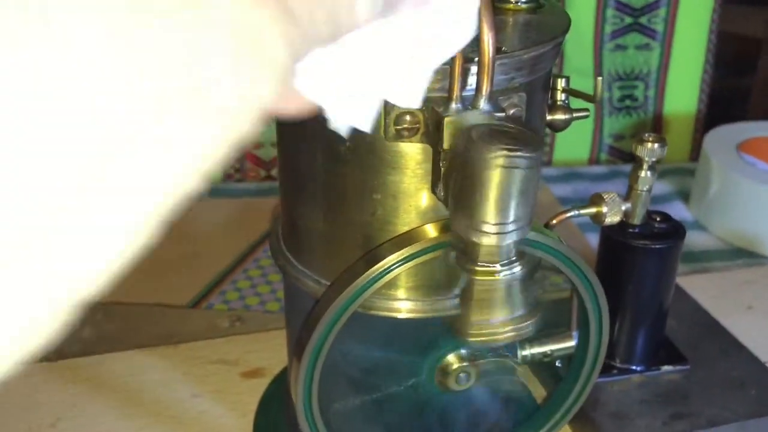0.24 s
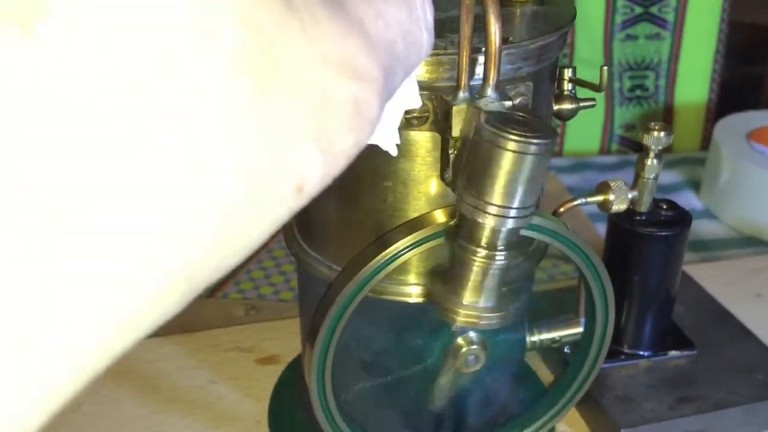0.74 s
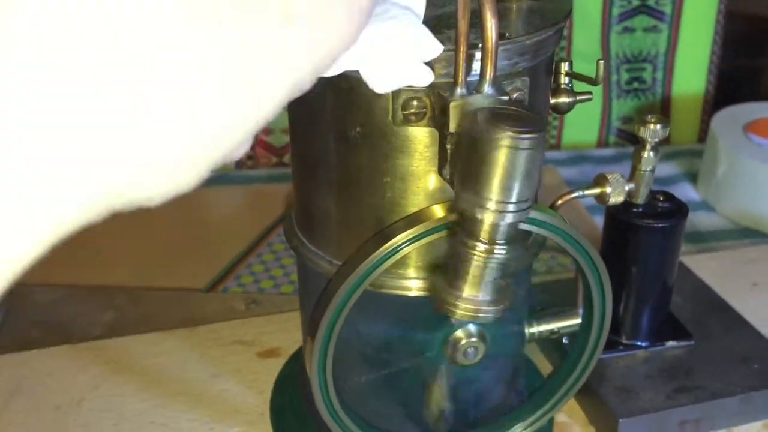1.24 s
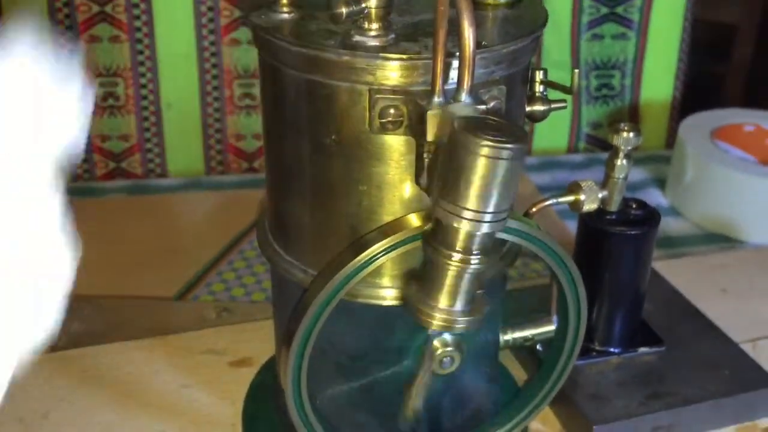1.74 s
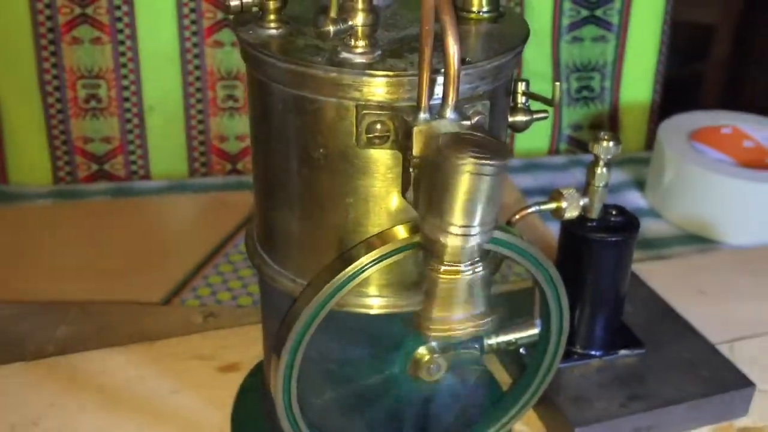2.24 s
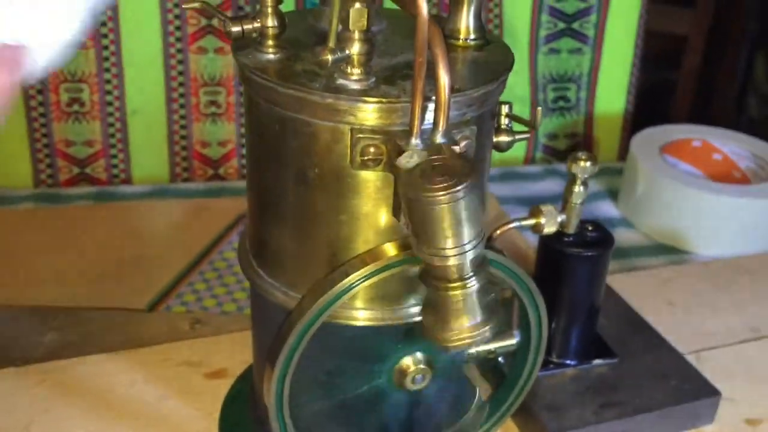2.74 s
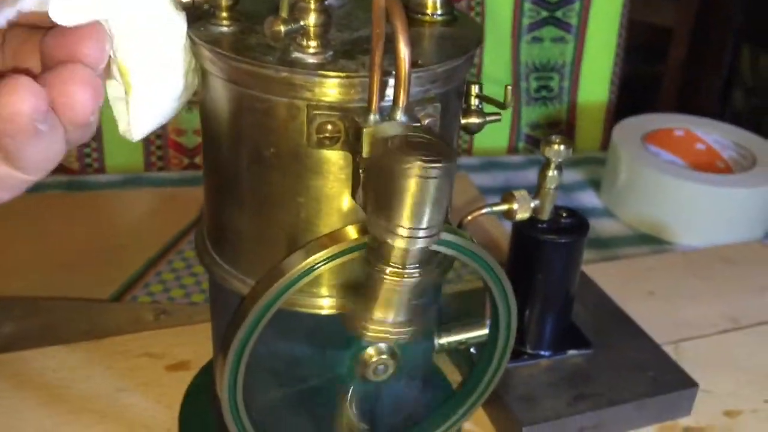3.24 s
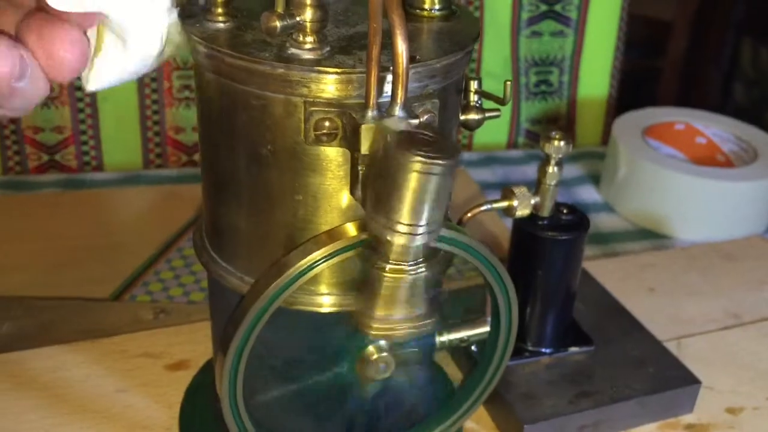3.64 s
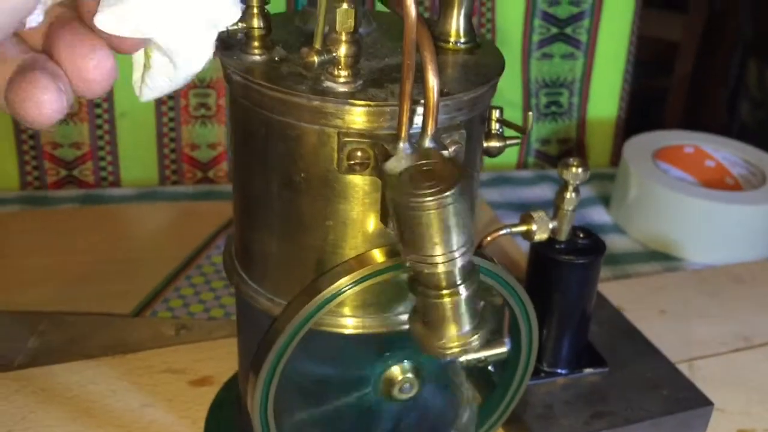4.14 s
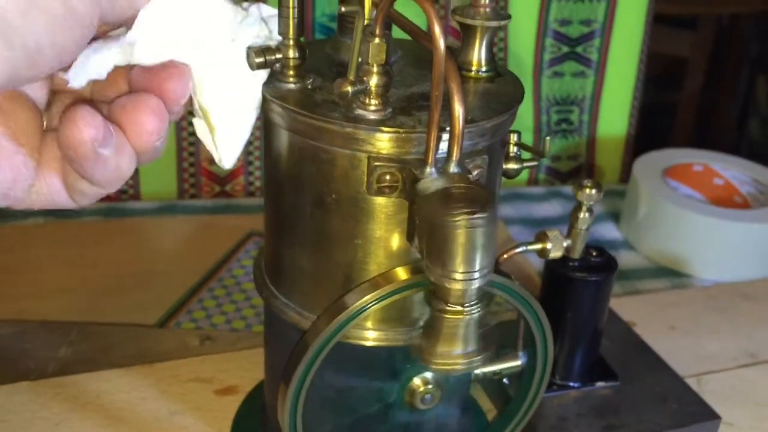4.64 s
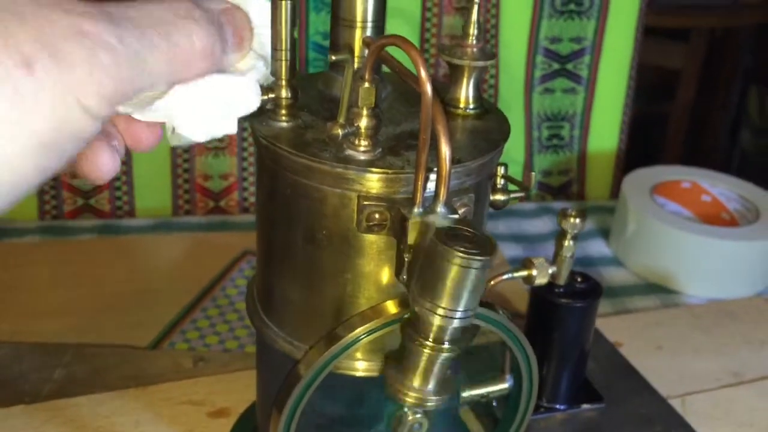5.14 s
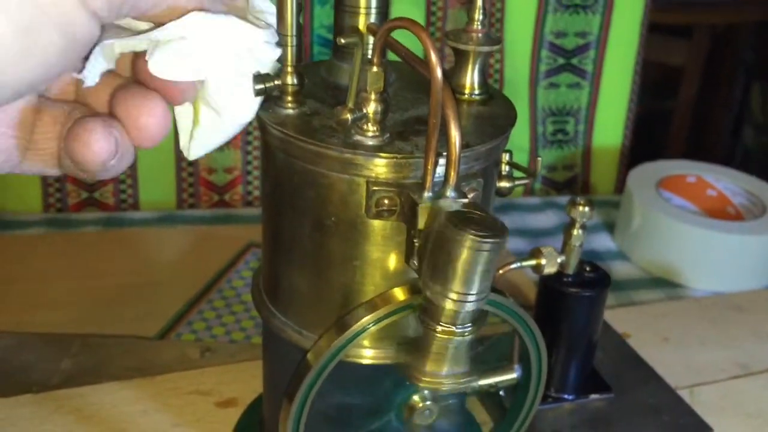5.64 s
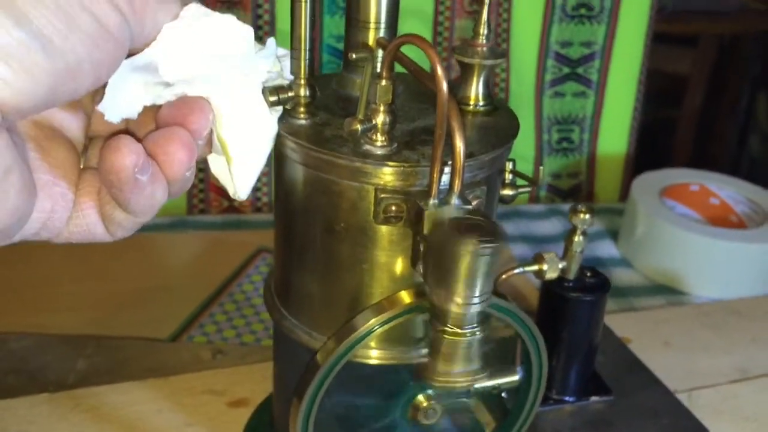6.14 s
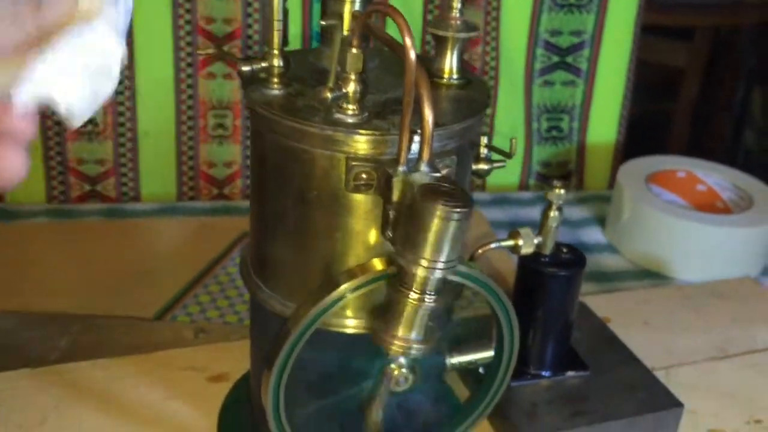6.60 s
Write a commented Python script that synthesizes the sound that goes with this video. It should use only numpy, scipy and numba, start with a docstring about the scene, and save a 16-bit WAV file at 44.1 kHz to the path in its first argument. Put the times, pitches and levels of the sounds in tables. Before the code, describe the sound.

A miniature one-cylinder steam engine runs close by in a small room, about ten chuffs a second, each with a throaty pipe note, loose metal knocks and a spitting exhaust puff. It quickens slightly, then a piercing, very high whistle blows twice, wet and sputtering first, cleaner the second time. Each blast drowns the engine and droops at its end; the mono pickup ducks, then recovers.

```python
"""A small one-cylinder steam engine turns about ten times a second, quickening from 1 s to 3 s.
Each turn admits steam through a ringing pipe, knocks in loose bearings and puffs out the exhaust.
Early on a fitting hisses briefly. At 3.8 s and 5.2 s a hand opens the boiler's whistle: a gliding tone
that sputters on wet steam, swells, and sags as the valve shuts; faint chirps seep past the valve.
A small room answers; a slow gain control sinks under loud sound and recovers at a steady rate."""
import sys
import numpy as np
from scipy import signal
from scipy.fft import rfft, irfft, next_fast_len
from scipy.io import wavfile
from scipy.ndimage import uniform_filter1d, minimum_filter1d, map_coordinates
from numba import njit

SR = 44100
rng = np.random.default_rng(int(sys.argv[2]) if len(sys.argv) > 2 else 0)


def log_audio(samples):
    """Write samples as a 16-bit WAV file to the path given in sys.argv[1]."""
    # one column per channel
    frames = np.atleast_2d(samples).T
    # limit to full scale, then quantise
    limited = np.clip(frames, -1, 1)
    pcm = np.round(limited * 32767).astype(np.int16)
    wavfile.write(sys.argv[1], SR, pcm)


N = 302967

# Room decay. Each row: frequency in Hz, t60 in seconds.
ROOM_DECAY = [(100, 0.072), (400, 0.15), (1000, 0.27), (5000, 0.29), (15000, 0.063)]
# Microphone's bass cut. Each row: frequency in Hz, gain in dB.
MIC_BASS_CUT = [(20, -32), (38, -16.5), (52, 0), (70, 0.5)]
# Colour of boiler simmer and room murmur. Each row: frequency in Hz, relative density in dB.
SIMMER_COLOUR = [(25, -25.5), (60, -0.5), (140, 5.5), (280, -11), (450, -9.5), (700, 1.5), (1250, -6),
                 (1900, -0.5), (2600, -5), (5000, -16), (6200, -12.5), (7500, -31), (9000, -13),
                 (10400, -17), (12000, -20.5), (15500, -19.5)]
# Short hiss from a boiler fitting. Each row: time in seconds, level in dB.
WEEP_LEVEL = [(0, -51), (.19, -59.5), (.22, -51.5), (.27, -44.5), (.305, -48.5), (.345, -50), (.39, -47.5),
              (.6, -72.5)]
# Colour of that hiss. Each row: frequency in Hz, relative density in dB.
WEEP_SPECTRUM = [(1000, -19.5), (3000, 6.5), (5000, 0), (8500, 0), (11000, -4.5), (15500, -12.5)]
# Flywheel speed. Each row: time in seconds, turns per second.
FLYWHEEL_SPEED = [(0.0, 9.617), (1.05, 9.636), (1.4, 9.965), (2.0, 10.42), (3.0, 10.758), (3.8, 10.669),
                  (4.5, 10.458), (5.1, 10.552), (5.8, 10.137), (6.87, 10.198)]
# How hard the engine works. Each row: time in seconds, base level in dB.
ENGINE_EFFORT = [(0, -31), (.95, -32.5), (1.3, -31), (2.1, -29.5), (2.65, -30.5), (3.35, -30.3), (3.7, -29),
                 (4.2, -31), (6.87, -32)]
# Modes of base plate and table top. Each row: frequency in Hz, t60 in seconds,
# dB pushed at the crank, dB pushed at the piston (both relative).
BASE_MODES = [(62.6, 0.02, -24.5, -23.5), (117.5, 0.035, -12.5, -1), (139.7, 0.34, -31.5, -24),
              (206, 0.033, -9.5, -12.5), (340.6, 0.024, -4, -4.5)]
# Hand bumping the boiler. Each row: time in seconds, level in dB.
HAND_BUMPS = [(5.085, -40.5), (5.307, -30), (5.334, -35)]
# Exhaust colour. Each row: frequency in Hz, relative density in dB.
EXHAUST_COLOUR = [(60, -17), (250, -7.5), (450, 4), (1000, -11.5), (2500, 10.5), (5000, 1.5), (6200, 4.5),
                  (9500, 4), (10400, -0.5), (11600, 4.5), (15500, 3.5)]
# Modes of the engine frame. Each row: frequency in Hz, t60 in seconds,
# dB struck at the crank, dB struck at the piston (both relative).
FRAME_MODES = [(540, 0.043, -26.5, -16), (704, 0.048, -12, -18.5), (812, 0.048, -8.5, -25.5),
               (1009, 0.025, -5, -13.5), (1099, 0.029, 0.5, -26.5), (1680, 0.032, -4.5, -10.5),
               (1927, 0.017, 1.5, 4), (2057, 0.034, -11.5, 5.5), (2188, 0.03, -7.5, -12.5),
               (2860, 0.012, -3.5, 0.5), (3360, 0.015, -8, -4), (3660, 0.029, -11, -21.5),
               (4400, 0.011, -6, -24.5), (6460, 0.027, -24.5, -13)]
# Metal contacts around dead centre. Each row: share of a turn after the knock, relative level in dB,
# timing scatter in seconds, place from 0 (crank) to 1 (piston).
DEAD_CENTRE_CONTACTS = [(-.058, -6.5, 0.0016, 0.39), (-.035, -14, 0.00068, 0.96), (0, 2, 0.000089, 0.12),
                        (.098, 0.5, 0.00024, 0.4), (0.116, -12.5, 0.00039, 0.085),
                        (0.168, -11.5, 0.0012, 0.88)]
# Resonances of steam pipe and cylinder. Each row: frequency in Hz, width in Hz, relative level in dB.
PIPE_RESONANCES = [(130, 71, -30.5), (726, 53, -4), (1060, 84, -11), (1561, 102, -0.5), (3106, 110, -7),
                   (3530, 460, -14.5), (4306, 140, -7), (5967, 284, -8.5), (8700, 300, -18.5)]
# Steam flow in one stroke. Each row: seconds after admission, rush in dB, pipe note in dB (both relative).
STROKE_FLOW = [(-.01, -46, -64.5), (-.004, -2, -31), (0, 4, -11.5), (.004, 4.5, 5.5), (.009, -6, -0.5),
               (0.018, -3, -1), (.034, -1.5, -7.5), (.046, -27.5, -15.5), (0.069, -50.5, -44)]
# How loudly the pipe sings. Each row: time in seconds, base level in dB.
PIPE_SINGING = [(0, -39), (1.3, -39), (2, -36), (2.9, -31.5), (3.55, -38), (4.2, -32.5), (4.8, -41.5),
                (5.1, -31.5), (6.2, -30), (6.65, -41)]
# Strokes with a set note level. Each row: time in seconds, base level in dB.
SET_NOTES = [(.003, -32), (.728, -31.5), (1.039, -35), (1.547, -36.5), (1.744, -30), (2.034, -29.5),
             (3.725, -30.5), (4.006, -24.5), (4.96, -28)]
# Whistle blasts. Each row: valve opens in seconds, shut in seconds, time to shut in seconds,
# first opening 0-1, tone level in dB, fully open pitch in Hz, swell in dB, wet spray in dB, wet for seconds.
WHISTLE_BLASTS = [(3.837, 4.55, 0.17, .89, 4.5, 5532, 6.5, -17.5, 0.18),
                  (5.192, 5.858, .102, 0.58, 5.5, 5566, 5.5, -31.5, 0.1)]
# Chirps of seeping steam. Each row: start in seconds, length in seconds, start Hz, end Hz, level in dB.
SEEP_CHIRPS = [(5.066, .03, 4330, 4940, -38.5), (5.076, .055, 4950, 3360, -50.5),
               (5.108, .06, 5540, 5250, -39), (5.177, 0.012, 5300, 6270, -25),
               (5.976, 0.1, 5400, 5220, -41)]
# Hiss at the whistle's lip. Each row: frequency in Hz, relative density in dB.
JET_COLOUR = [(100, 9.5), (700, -6.5), (2000, 0.5), (4500, 12), (5600, 17), (7000, -27.5), (9500, 6),
              (11000, 2), (12500, 6.5), (15500, -3)]
# Colour of the wet spray. Each row: frequency in Hz, relative density in dB.
SPRAY_COLOUR = [(300, -32.5), (1500, -32), (3000, -22.5), (4600, -8.5), (5500, 9), (6500, 2.5), (7500, -7),
                (9000, -15.5), (12000, -23), (15500, -15)]
# Water slugs shot through the whistle. Each row: time in seconds, splutter in dB, width in seconds,
# tone choked by dB, pitch bent by a share.
WATER_SLUGS = [(3.827, -23, 0.0093, 2, .03), (3.839, -24, 0.0024, -0.5, 0.018),
               (3.884, -33, 0.0061, 6, -.02), (3.931, -21.5, 0.0068, 19.5, -.025),
               (3.955, -20, 0.0054, 1.5, .015), (4.153, -22.5, 0.009, 1, -0.0095),
               (5.197, -31.5, 0.0038, 8, 0.0032), (5.478, -30.5, .004, 4, 0.016),
               (5.668, -32.5, .005, -1, -.012)]
# Colour of the splutter. Each row: frequency in Hz, relative density in dB.
SLUG_COLOUR = [(200, -25), (900, -18), (1500, -7.5), (2900, 0), (4200, -6), (5500, 5.5), (7000, 2.5),
               (9500, -13), (15500, -16.5)]

TOP_HZ = 15400  # band limit
FIRST_KNOCK_S = .0426
ADMISSION_LEAD_TURNS = 0.4046  # port opens this far before the knock
OPENING_S = 0.087  # time constant of the valve easing fully open
SPEAK_S = 0.0022  # linear build-up of the tone
PITCH_POWER, LEVEL_POWER = .21, 3.43  # pitch and amplitude go with these powers of the opening
DRYING_DB_PER_S, MIST_DB = 260, -48  # the spray dries down to a thin mist
SWELL_S = 0.23  # width of the bell by which the pipe clears


def amp(db):
    """Decibels to gain."""
    return 10 ** (np.asarray(db) / 20)


def unit(x):
    """x at rms 1."""
    return x / np.sqrt(np.mean(x ** 2) + 1e-20)


def along(points, hz):
    """(Hz, value) points read on a log axis."""
    f, v = np.transpose(points)
    return np.interp(np.log(hz + 1), np.log(f + 1), v)


def curves(rows):
    """One value per sample for each column after the time."""
    s, *cols = np.transpose(rows)
    return [np.interp(np.arange(N) / SR, s, c) for c in cols]


def wobble(knots_per_s):
    """Smooth random curve."""
    knots = rng.standard_normal(int(N * knots_per_s / SR) + 4)
    return map_coordinates(knots, [np.arange(N) * knots_per_s / SR])


def filtered(x, response):
    """x times a response of frequency."""
    size = next_fast_len(N + SR // 2)
    return irfft(rfft(x, size) * response(np.fft.rfftfreq(size, 1 / SR)), size)[:N]


def noise(spectrum):
    """Coloured noise of rms 1."""
    white = rng.standard_normal(N)
    return unit(filtered(white, lambda hz: amp(along(spectrum, hz))))


def add(track, start_s, sound):
    """Mix a sound into the track, cropped to its ends."""
    start = round(start_s * SR)
    part = sound[max(-start, 0):max(N - start, 0)]
    track[max(start, 0):][:len(part)] += part


def swells(times_s, levels_db, width_s):
    """Envelope of bell-shaped swells, one at each time."""
    track, t = np.zeros(N), np.arange(-SR // 20, SR // 20) / SR
    bell = np.exp(-.5 * (t / width_s) ** 2)
    for s, db in zip(times_s, levels_db):
        add(track, s + t[0], amp(db) * bell)
    return track


def room(x):
    """Room reverberation: a noise tail in which each frequency dies at its own speed."""
    hz, t, z = signal.stft(rng.standard_normal(SR // 2), SR, nperseg=256)
    decay = amp(-60 * t / along(ROOM_DECAY, hz)[:, None])
    tail = signal.istft(z * decay, SR, nperseg=256)[1]
    tail = np.pad(tail, (SR // 200, 0))  # 5 ms before the answer
    return signal.fftconvolve(x, tail / np.linalg.norm(tail))[:N]


def air(simmer_db=-50.5, follow=0.97):
    """Boiler simmer and room murmur as one noise that follows the effort; a fitting weeps steam."""
    effort_db, = curves(ENGINE_EFFORT)
    simmer_level_db = simmer_db + follow * (effort_db - effort_db.mean()) + wobble(25)
    simmer = amp(simmer_level_db) * noise(SIMMER_COLOUR)
    weep = amp(curves(WEEP_LEVEL)[0] + wobble(40)) * noise(WEEP_SPECTRUM)
    return simmer + weep


def turns():
    """For each flywheel turn: knock time (s), length (s) and strength (dB), from integrated speed."""
    speed, = curves(FLYWHEEL_SPEED)
    done = np.cumsum(speed) / SR
    done -= done[round(FIRST_KNOCK_S * SR)]
    at = np.searchsorted(done, np.arange(int(done[-1]) + 1))
    return at / SR, 1 / speed[at], curves(ENGINE_EFFORT)[0][at]


def thumps(crank_lag_s=0.00095, piston_share=0.0863, rise_s=0.0017, level_db=1,
           bump_hz=100, bump_t60_s=0.073):
    """Crank, then piston, pushes the base into its low modes every turn; a hand bumps the boiler."""
    track, t = np.zeros(N), np.arange(SR // 4) / SR

    def push(hz, t60_s):
        """Decaying mode with a soft onset."""
        return np.sin(2 * np.pi * hz * t) * (1 - np.exp(-t / rise_s)) * amp(-60 * t / t60_s)

    crank = sum(amp(db) * push(hz, t60_s) for hz, t60_s, db, _ in BASE_MODES)
    piston = sum(amp(db) * push(hz, t60_s) for hz, t60_s, _, db in BASE_MODES)
    for s, turn_s, db in zip(*turns()):
        add(track, s + crank_lag_s, -amp(db + level_db) * crank)
        add(track, s + crank_lag_s + piston_share * turn_s, -amp(db + level_db) * piston)
    for s, db in HAND_BUMPS:
        add(track, s, amp(db) * push(bump_hz, bump_t60_s))
    return track


def exhaust(puff_lag_s=0.005, puff_db=-1, tail_db=-15, blowby_lag_s=0.013, blowby_db=-12):
    """Spent steam spits out as noise just after the knock; some slips past the port face in mid-stroke."""
    knocked_s, turn_s, strength_db = turns()
    admitted_s = knocked_s - ADMISSION_LEAD_TURNS * turn_s
    level_db = strength_db + rng.normal(0, 1, len(knocked_s))
    puffs = swells(knocked_s + puff_lag_s, level_db + puff_db, width_s=0.0018)
    puffs += swells(knocked_s + 2 * puff_lag_s, level_db + tail_db, width_s=0.0039)
    puffs += swells(admitted_s + blowby_lag_s, level_db + blowby_db, width_s=0.0059)
    puffs += swells(admitted_s, level_db - 13.5, width_s=0.0023)
    return puffs * unit(noise(EXHAUST_COLOUR) * amp(1.6 * wobble(1500)))


def blow(modes_db, crack_db, crack_t60_s, snap_db=4, snap_hz=3000, snap_t60_s=0.00069):
    """One metal contact: a hard snap, a short crack and the frame's modes at fresh strengths."""
    t = np.arange(SR // 10) / SR
    hz, t60_s = np.transpose(FRAME_MODES)[:2, :, None]
    size, phase = rng.standard_normal((2, len(FRAME_MODES), 1))
    decay = amp(modes_db[:, None] + 3.64 * size - 60 * t / t60_s)
    ring = decay * np.sin(2 * np.pi * hz * t + 0.87 * phase)
    crack = amp(crack_db - 60 * t / crack_t60_s) * rng.standard_normal(len(t))
    snap = amp(snap_db - 60 * t / snap_t60_s) * np.sin(2 * np.pi * snap_hz * t)
    return (ring.sum(0) + crack + snap) * (1 - np.exp(-t / 0.00025))


def knocks(crack_db=-2, crack_t60_s=0.0038):
    """Slack taken up at dead centre: two light taps, the crank's knock, then three more contacts."""
    track = np.zeros(N)
    at_crank_db, at_piston_db = np.transpose(FRAME_MODES)[2:]
    for s, turn_s, db in zip(*turns()):
        for share, contact_db, scatter_s, place in DEAD_CENTRE_CONTACTS:
            modes_db = at_crank_db + place * (at_piston_db - at_crank_db)
            sound = blow(modes_db, crack_db, crack_t60_s)
            contact_s = s + share * turn_s + scatter_s * rng.normal()
            add(track, contact_s, amp(db + contact_db + rng.normal()) * sound)
    return track


def pipe_response(f):
    """Sum of resonances with alternating sign."""
    total = 0
    for k, (centre_hz, width_hz, db) in enumerate(PIPE_RESONANCES):
        damping = 1j * f * width_hz
        total = total + (-1) ** k * amp(db) * damping / (centre_hz ** 2 - f * f + damping)
    return total


def admission(flow_db=-9.0, ring_db=-2.5, ring_scatter_db=2, ring_hz=1515,
              turn_waver=0.00878, stroke_waver=0.0195, flutter_db=3.0):
    """The port opens: steam rushes through the pipe's resonances and blows a short, throaty note."""
    flow, ring, t = np.zeros(N), np.zeros(N), np.arange(SR // 10) / SR
    after_s, rush_db, note_db = np.transpose(STROKE_FLOW)
    rush = amp(np.interp(t + after_s[0], after_s, rush_db))
    note = amp(np.interp(t + after_s[0], after_s, note_db))
    knocked_s, turn_s, strength_db = turns()
    admitted_s = knocked_s - ADMISSION_LEAD_TURNS * turn_s
    sung_db = np.interp(admitted_s, *np.transpose(PIPE_SINGING))
    sung_db = sung_db + ring_scatter_db * rng.standard_normal(len(admitted_s))
    for s, db in SET_NOTES:
        sung_db[np.argmin(np.abs(admitted_s - s))] = db  # nearest stroke
    for s, db, level_db in zip(admitted_s, sung_db, strength_db):
        add(flow, s + after_s[0], amp(level_db + flow_db) * rush)
        add(ring, s + after_s[0], amp(db + ring_db) * note)
    steam = rng.standard_normal(N) * amp(3.3 * wobble(400))
    # water in the pipe bends the note, from turn to turn and within a stroke
    hz = ring_hz * (1 + turn_waver * wobble(11) + stroke_waver * wobble(220))
    tone = np.sin(2 * np.pi * np.cumsum(hz) / SR) * amp(flutter_db * wobble(180))
    piped = filtered(flow * steam, pipe_response) / np.std(filtered(steam, pipe_response))
    return piped + ring * tone


def opening(opens_s, shut_s, closing_s, first):
    """Valve opening (0-1): starts at first, eases fully open, then closes ever faster."""
    t = np.arange(N) / SR
    eased = 1 - (1 - first) * np.exp(-np.maximum(t - opens_s, 0) / OPENING_S)
    closed = np.clip((t - shut_s) / closing_s + 1, 0, 1) ** 2
    return np.clip(eased * (1 - closed), 1e-4, 1)


def seeps():
    """Steam past the barely open valve pipes faint gliding chirps."""
    track = np.zeros(N)
    for s, length_s, start_hz, end_hz, db in SEEP_CHIRPS:
        hz = np.linspace(start_hz, end_hz, round(length_s * SR))
        chirp = np.hanning(len(hz)) * np.sin(2 * np.pi * np.cumsum(hz) / SR)
        add(track, s, amp(db) * np.sqrt(2) * chirp)
    return track


def spray(onset_db_per_s=1500):
    """Spray amplitude: condensed water blows out at the start of each blast, then dries up."""
    t, total = np.arange(N) / SR, np.zeros(N)
    for opens_s, shut_s, closing_s, first, _, _, _, wet_db, wet_s in WHISTLE_BLASTS:
        water = amp(wet_db - DRYING_DB_PER_S * np.maximum(t - opens_s - wet_s, 0))
        mist = amp(MIST_DB) * opening(opens_s, shut_s, closing_s, first)
        total += (water + mist) * amp(-onset_db_per_s * np.maximum(opens_s - t, 0))
    return total


def valve(jet_db=-32, lead_db_per_s=140, spit_db=1.5, grain_db=1.5):
    """Steam hisses at the whistle's lip, even before it speaks; the spray comes in spits."""
    t, spits = np.arange(N) / SR, wobble(170)
    flow = np.zeros(N)
    for blast in WHISTLE_BLASTS:
        lead = amp(-lead_db_per_s * np.maximum(blast[0] - t, 0))
        flow += opening(*blast[:4]) ** 2 * lead
    jet = flow * amp(jet_db + 0.96 * wobble(65) + 1.5 * spits) * noise(JET_COLOUR)
    spitting = amp(-0.5 + spit_db * spits + grain_db * wobble(900))
    return jet + spray() * spitting * noise(SPRAY_COLOUR)


def spurts(grain_db=4):
    """Each slug of water breaks up at the lip in a short, coarse splutter."""
    bursts = sum(swells([s], [db], width_s) for s, db, width_s, _, _ in WATER_SLUGS)
    return bursts * unit(noise(SLUG_COLOUR) * amp(grain_db * wobble(800)))


def whistle(octave_db=-39, waver=0.0019, drift=0.0013, surge=.005, surge_width_s=0.019,
            flutter_db=-0.4, wet_waver=0.0055, wet_flutter_db=2):
    """Nearly pure pipe tone: follows the valve, lifts in pitch at each engine turn, staggers on water."""
    track, t, water = np.zeros(N), np.arange(N) / SR, spray()
    wet = np.sqrt(water / water.max())
    choke_db = sum(db * swells([s], [0], width_s) for s, _, width_s, db, _ in WATER_SLUGS)
    kicks = sum(share * swells([s], [0], width_s) for s, _, width_s, _, share in WATER_SLUGS)
    knocked_s = turns()[0]
    surges = swells(knocked_s, np.zeros(len(knocked_s)), surge_width_s)
    bend = 1 + surge * (surges - surges.mean()) + kicks
    bend += drift * wobble(30) + (waver + wet_waver * wet) * wobble(330)
    for opens_s, shut_s, closing_s, first, db, top_hz, swell_db, _, _ in WHISTLE_BLASTS:
        gap = opening(opens_s, shut_s, closing_s, first)
        phase = 2 * np.pi * np.cumsum(top_hz * gap ** PITCH_POWER * bend) / SR
        clogged = np.exp(-((t - opens_s) / SWELL_S) ** 2)
        speaking = np.clip((t - opens_s) / SPEAK_S, 0, 1)
        level = amp(db - swell_db * clogged) * gap ** LEVEL_POWER * speaking
        track += np.sqrt(2) * level * (np.sin(phase) + amp(octave_db) * np.sin(2 * phase))
    return track * amp((flutter_db + wet_flutter_db * wet) * wobble(280) - choke_db)


def scene():
    """Engine and whistle close by, in a small room."""
    engine = admission() + knocks() + exhaust() + thumps()
    steam = whistle() + seeps() + valve() + spurts()
    answer = amp(-19.5) * room(engine) + amp(-17.5) * room(steam)
    return (engine + steam + answer + air())[None]


@njit
def gain_cut(excess_db, attack, release):
    """Gain reduction (dB): creeps up to the excess level, falls back at a steady rate per sample."""
    cut, now = np.zeros(len(excess_db)), 0.0
    for i in range(len(excess_db)):
        if excess_db[i] > now:
            now += (excess_db[i] - now) * attack
        else:
            now = max(excess_db[i], now - release)
        cut[i] = now
    return cut


def record(dry, threshold_db=-13, attack_s=0.089, release_db_per_s=25):
    """Mono: bass cut, slow gain control, peak limiter, band limit."""
    sound = filtered(dry[0], lambda hz: amp(along(MIC_BASS_CUT, hz)))
    power = np.abs(uniform_filter1d(sound ** 2, size=441))  # 10 ms mean
    excess_db = np.maximum(10 * np.log10(power + 1e-12) - threshold_db, 0)
    sound = sound * amp(-gain_cut(excess_db, 1 / (attack_s * SR), release_db_per_s / SR))
    ceiling = .95
    needed = np.minimum(1, ceiling / (np.abs(sound) + 1e-9))
    gain = uniform_filter1d(minimum_filter1d(needed, size=129), size=129)
    return filtered(sound * gain, lambda hz: hz < TOP_HZ)[None]


dry = scene()
out = record(dry)
log_audio(out)
```